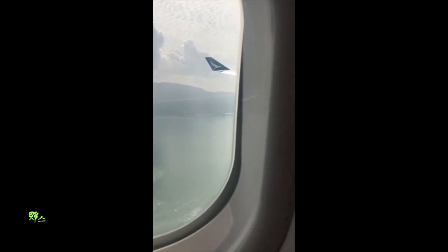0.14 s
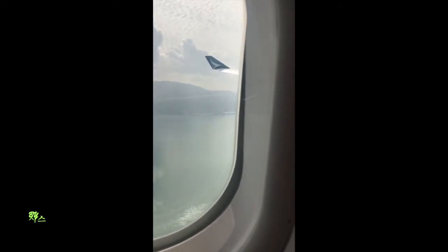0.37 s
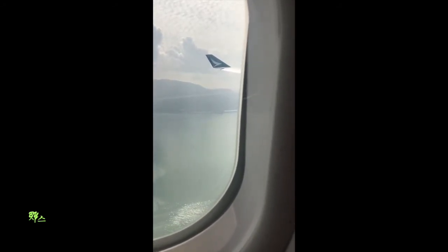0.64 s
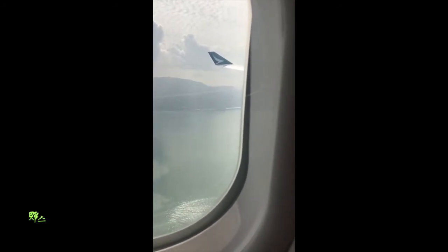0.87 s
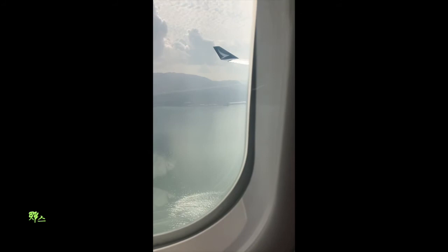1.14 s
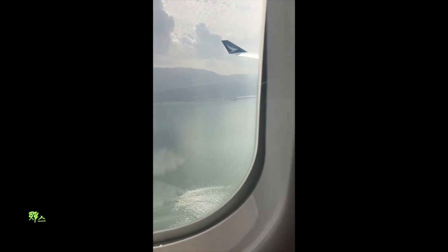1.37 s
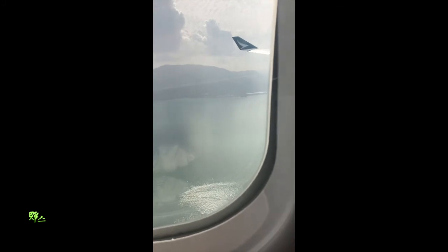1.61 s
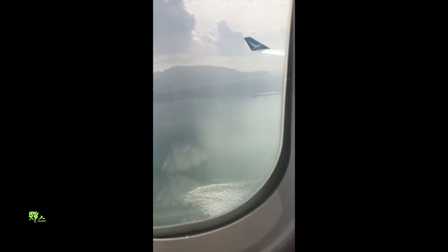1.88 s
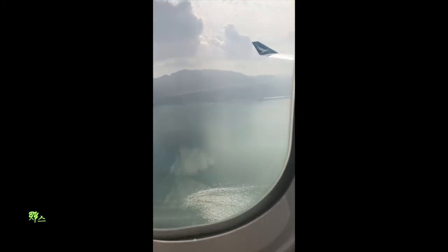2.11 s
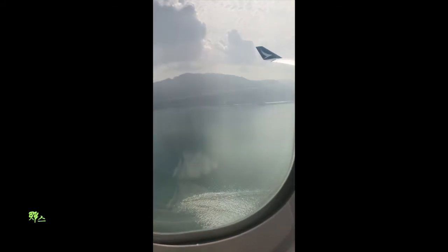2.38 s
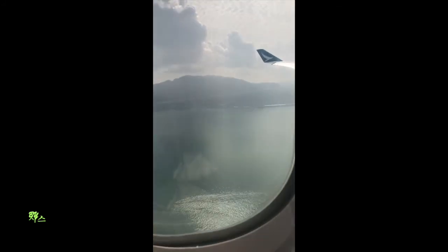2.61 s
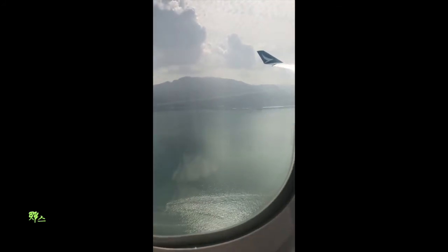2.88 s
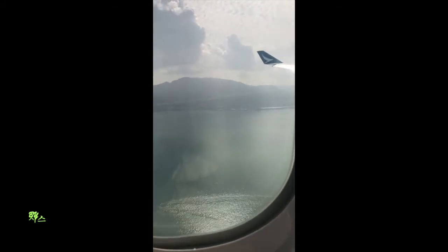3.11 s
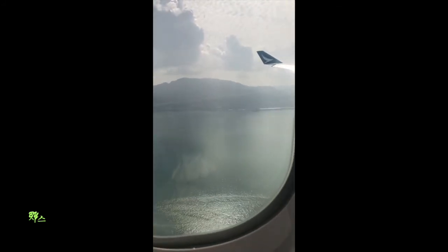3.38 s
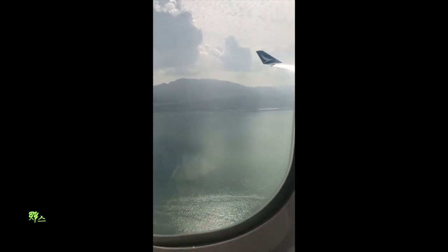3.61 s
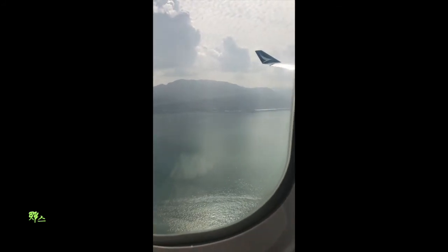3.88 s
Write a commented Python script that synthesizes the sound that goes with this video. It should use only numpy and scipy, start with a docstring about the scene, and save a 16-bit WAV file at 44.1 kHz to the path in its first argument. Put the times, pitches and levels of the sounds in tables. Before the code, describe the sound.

Jet engine rumble and vent hiss inside a flying airliner, soft cloth rustle fading early

```python
"""Inside an airliner in flight, a phone held at the window. From the start, shaped noise and low shaft tones
rumble through the hull in surges, noise hisses from the air vents, and wandering sines make the fan whine and
the 400 Hz supply sing. Cloth noise close by dies away by 1.7 s; tiny clicks crackle at random throughout.
Decaying noise ticks start at 0.07 s, one about every second from 0.53 s with others between; short hisses
of treble noise come from 0.23 s, and faint blips of sagging sines from 0.61 s."""
import sys
import numpy as np
from scipy import signal
from scipy.fft import rfft, irfft, next_fast_len
from scipy.io import wavfile
from scipy.ndimage import uniform_filter1d, map_coordinates

SR = 44100
rng = np.random.default_rng(int(sys.argv[2]) if len(sys.argv) > 2 else 0)


def log_audio(samples):
    """Write samples as a 16-bit WAV file to the path given in sys.argv[1]."""
    # one column per channel
    frames = np.atleast_2d(samples).T
    # limit to full scale, then quantise
    limited = np.clip(frames, -1, 1)
    pcm = np.round(limited * 32767).astype(np.int16)
    wavfile.write(sys.argv[1], SR, pcm)


def volts_from_decibels(level):
    """Turn decibel levels (scalar or array-like) into linear amplitude factors."""
    exponent = np.asarray(level, float) / 20
    return 10 ** exponent


N = 176400  # samples, 4 s


def unit(x):
    """Scales a signal to rms 1."""
    return x / np.sqrt(np.mean(x ** 2) + 1e-20)


def along(points, hz):
    """Reads (Hz, value) points on a log frequency axis."""
    point_hz, value = np.transpose(points)
    return np.interp(np.log(hz + 1), np.log(point_hz + 1), value)


def wobble(rate):
    """A smooth random curve with this many knots a second."""
    knots = rng.standard_normal(int(N * rate / SR) + 4)
    return map_coordinates(knots, [np.arange(N) * rate / SR])


def filtered(x, response):
    """Multiplies the spectrum of x by a response of frequency."""
    size = next_fast_len(x.shape[-1] + 8192)
    spectrum = rfft(x, size) * response(np.fft.rfftfreq(size, 1 / SR))
    return irfft(spectrum, size)[..., :x.shape[-1]]


def rush(spectrum, patchy_db):
    """Coloured noise of rms 1 whose level varies in patches of time and frequency."""
    pad = SR // 2
    cells = signal.stft(rng.standard_normal(N + 2 * pad), nperseg=512)[2]
    patches = uniform_filter1d(rng.standard_normal(cells.shape), size=8, axis=0)
    patches = uniform_filter1d(patches, size=10, axis=1)
    noise = signal.istft(cells * volts_from_decibels(patchy_db * unit(patches)), nperseg=512)[1]
    coloured = filtered(noise, lambda hz: volts_from_decibels(along(spectrum, hz)))
    return unit(coloured[pad:pad + N])


def tones(rows, rate, sway_db):
    """Sums sines that wander a little in pitch and level."""
    total = np.zeros(N)
    for pitch_hz, level_db, wander_hz in rows:
        level = np.sqrt(2) * volts_from_decibels(level_db + sway_db * wobble(rate))  # rms to peak
        cycles = np.cumsum(pitch_hz + wander_hz * wobble(rate)) / SR + rng.random()
        total += level * np.sin(2 * np.pi * cycles)
    return total


# colour of the noise the hull lets through: pitch_hz, relative level_db (per Hz)
HULL_COLOUR = [(13, -48.5), (24, -34), (30, -16), (36, -3.5), (50, -2.5), (75, -0.5), (100, -1), (125, -6),
               (150, -8.5), (185, -10), (200, -12), (245, -14), (280, -12.5), (295, -16), (340, -17.5),
               (370, -24), (385, -28), (430, -26.5), (450, -37), (490, -40), (700, -45), (910, -58.5),
               (1540, -120)]
# low tones of the engine shafts: pitch_hz, level_db (rms, before the surges and throb), wander_hz
SHAFT_TONES = [(39.1, -42, 2.76), (65.54, -43.5, 2.92), (87.65, -41, 3.01), (102.6, -42.5, 3.047)]
# surges of the deep rumble: time_s, gain_db
RUMBLE_SURGES = [(0, 0.5), (.15, -1), (.26, 3), (.38, -1), (.79, 1), (1.24, -2), (1.55, 2), (1.6, -3.5),
                 (1.73, 3), (1.78, -1), (2.38, -.5), (2.43, -2.5), (2.47, 2.5), (2.53, 0.5), (2.72, 2.5),
                 (2.8, -3), (2.84, .5), (3.36, .5), (3.5, -3.5), (3.63, 4), (3.68, 1.5), (4, -1)]


def hull():
    """Engine and airstream rumble with shaft tones in it: the deep part surges, the part above throbs."""
    surge_top_hz, throb_db = 135, 1.16
    time_s, gain_db = np.transpose(RUMBLE_SURGES)
    surge_db = np.interp(np.arange(N) / SR, time_s, gain_db)
    rumble = volts_from_decibels(-27.5) * rush(HULL_COLOUR, patchy_db=0.33) + tones(SHAFT_TONES, rate=6, sway_db=3.5)
    deep = filtered(rumble, lambda hz: 1 / (1 + (hz / surge_top_hz) ** 6))
    return volts_from_decibels(surge_db) * deep + volts_from_decibels(throb_db * wobble(7.015)) * (rumble - deep)


# colour of the cabin air noise: pitch_hz, relative level_db (per Hz)
VENT_COLOUR = [(260, -23.5), (450, -2), (570, -8), (614, -5.5), (702, -8.5), (767, -7), (917, -13),
               (1160, -14.5), (1250, -19), (1350, -16.5), (1730, -18.5), (1980, -23), (2170, -23.5),
               (2370, -26), (2550, -23.5), (2960, -25), (4280, -29.5), (4580, -30.5), (4780, -34.5),
               (4980, -35.5), (5350, -29), (5800, -33), (6600, -33.5), (7640, -37), (10300, -40),
               (11600, -40.5), (15600, -42)]


def vents():
    """The smooth hiss of cabin air: broadband noise that sways slightly in level."""
    level_db = -56 + 0.29 * wobble(9)
    return volts_from_decibels(level_db) * rush(VENT_COLOUR, patchy_db=0.8)


# fan and turbine tones: pitch_hz, level_db (rms), wander_hz
FAN_TONES = [(2243, -79, 5), (1975, -87, 8), (2912, -89, 12), (3332, -90, 2), (15492, -103, 2)]
# overtones of the power supply: multiple of its frequency, level_db (rms)
SUPPLY_OVERTONES = [(16, -100), (18, -91), (20, -97), (22, -98), (24, -100), (26, -101), (28, -101),
                    (30, -95), (31, -104), (32, -103), (34, -105), (36, -102)]


def whines():
    """Wandering fan and turbine tones, and steadier harmonics of the power supply."""
    supply_hz, supply_wander_hz = 399.63, 0.4
    supply = [(multiple * supply_hz, level_db, supply_wander_hz) for multiple, level_db in SUPPLY_OVERTONES]
    return tones(FAN_TONES, rate=9, sway_db=1.5) + tones(supply, rate=5, sway_db=1.5)


# loudness of the cloth: time_s, level_db (rms)
RUSTLE_LEVEL = [(0, -64), (.2, -62.5), (.3, -65), (.45, -62.5), (.68, -63.5), (.74, -68), (1.5, -70.5),
                (1.7, -90.5), (4, -87)]
# colour of the cloth noise: pitch_hz, relative level_db (per Hz)
CLOTH_COLOUR = [(400, -38), (850, 0.5), (1500, -2.5), (2200, -8.5), (3500, -15.5), (6000, -21), (9500, -27),
                (11500, -24.5), (13500, -31.5), (16000, -42.5)]


def rustle():
    """Cloth brushing near the phone: patchy friction noise, dying away."""
    time_s, level_db = np.transpose(RUSTLE_LEVEL)
    level = volts_from_decibels(np.interp(np.arange(N) / SR, time_s, level_db))
    return level * rush(CLOTH_COLOUR, patchy_db=1.5)


TICK_T60_S = 0.011  # time in which a click falls by 60 dB, in crackle and ticks


def crackle():
    """Tiny bright clicks, scattered at random: each is a fast-decaying burst of high-passed noise."""
    clicks_per_s, faintest_db, spread_db, lowest_hz = 25, -71, 1.5, 11500  # levels before the high-pass
    draw = rng.random((400, 2))
    time_s = np.cumsum(-np.log(draw[:, 0]) / clicks_per_s)
    size = volts_from_decibels(faintest_db - spread_db * np.log(draw[:, 1]))
    inside = time_s < N / SR
    blows = np.bincount((time_s[inside] * SR).astype(int), size[inside], N)
    decay = volts_from_decibels(-60 * np.arange(SR // 100) / SR / TICK_T60_S)
    burst = np.convolve(blows, decay)[:N] * rng.standard_normal(N)
    return signal.sosfilt(signal.butter(4, lowest_hz, "high", fs=SR, output="sos"), burst)


# sharp clicks: start_s, level_db (before the common 5.5 dB trim), lowest_hz
TICK_EVENTS = [(.0720, -51.5, 2520), (.5337, -57, 10900), (.7365, -66, 12000), (1.5387, -57.5, 8000),
               (1.5460, -61, 5020), (1.5911, -67, 12000), (1.6909, -64.5, 11500), (2.5441, -60, 10500),
               (3.3665, -64, 12100), (3.3985, -63, 11600), (3.4324, -65.5, 11600), (3.5485, -63, 11500)]


def ticks():
    """Sharp bright clicks with a brief rattle: high-passed noise under a fast decay and a short plateau."""
    tilt_db_per_octave, rattle_s, rattle_db = -3, 0.009, -9
    out, t = np.zeros(N + SR), np.arange(SR // 8) / SR
    shape = volts_from_decibels(-60 * t / TICK_T60_S) + volts_from_decibels(rattle_db) * np.exp(-(t / rattle_s) ** 4)
    for start_s, level_db, lowest_hz in TICK_EVENTS:
        high = signal.butter(3, min(lowest_hz, 15000), "high", fs=SR, output="sos")
        noise = rng.standard_normal(len(t))
        tilted = filtered(noise, lambda f: volts_from_decibels(tilt_db_per_octave * np.log2(1 + f / lowest_hz)))
        click = shape * unit(signal.sosfilt(high, tilted))
        out[round(start_s * SR):][:len(t)] += volts_from_decibels(level_db - 5.5) * click
    return out[:N]


# short hisses from close by: start_s, length_s, level_db (rms), centre_hz
HISS_EVENTS = [(.23, 0.087, -77, 6500), (0.765, .11, -73, 6200), (1, .21, -75, 6100),
               (1.335, 0.045, -74, 7000), (2.0, 0.087, -82, 7000), (2.08, .04, -73.5, 6500),
               (2.764, .04, -76, 6000), (3.43, .04, -80, 6000), (3.34, .3, -85.5, 14500)]


def hisses():
    """Short bursts of treble noise with soft edges, a grainy level and each its own uneven colour."""
    octaves, edge_s, grain_db = 0.6, 0.01, 1.5
    bump_db, bump_spacing_hz = 2.5, 250
    out, t, grain = np.zeros(N), np.arange(N) / SR, volts_from_decibels(grain_db * wobble(120))
    for start_s, length_s, level_db, centre_hz in HISS_EVENTS:
        a, b = int((start_s - .1) * SR), int((start_s + length_s + .1) * SR)
        bumps_db = bump_db * rng.standard_normal(100)

        def colour(f):
            """A flat-topped band with random bumps."""
            band = np.exp(-(np.log2((f + 1) / centre_hz) / octaves) ** 4 / 2)
            return volts_from_decibels(np.interp(f / bump_spacing_hz, range(100), bumps_db)) * band

        hiss = unit(filtered(rng.standard_normal(b - a), colour))
        since_s = t[a:b] - start_s
        gate = (np.tanh(since_s / edge_s) - np.tanh((since_s - length_s) / edge_s)) / 2
        out[a:b] += volts_from_decibels(level_db) * gate * hiss * grain[a:b]
    return out


# faint blips: middle_s, level_db (peak, before roughness), pitch_hz (at the middle), half_length_s
PING_EVENTS = [(.63, -65, 1981, .02), (.785, -70, 4330, .012), (.83, -73, 4250, .01),
               (1.04, -74, 4300, .01), (1.13, -71, 4500, .008), (1.197, -76, 4560, .01),
               (1.794, -68, 2604, .008), (2.014, -72, 4080, .007), (2.43, -66, 2913, .011),
               (3.333, -70, 2680, .008), (3.28, -72, 2880, .012), (3.368, -64, 2600, .01),
               (3.49, -72, 2960, .01), (3.53, -71, 3100, .008), (3.605, -72, 2560, .01),
               (3.617, -71, 2730, .01), (3.745, -69, 2590, .009), (3.424, -51, 613, .008),
               (3.874, -63, 2608, .007)]


def pings():
    """Faint rough blips like small squeaks of trim: sines with soft ends that sag in pitch."""
    sag_hz_per_s = 5000
    out, t = np.zeros(N), np.arange(N) / SR
    rough = 1 + 0.2 * wobble(250)
    for middle_s, level_db, pitch_hz, half_length_s in PING_EVENTS:
        since_s = t - middle_s
        swell = np.exp(-(since_s / half_length_s) ** 2)
        cycles = (pitch_hz - sag_hz_per_s * since_s / 2) * since_s
        out += volts_from_decibels(level_db) * swell * np.sin(2 * np.pi * cycles)
    return rough * out


def scene():
    """Everything in the cabin adds up at one microphone."""
    steady = hull() + vents() + whines()
    close_by = rustle() + crackle() + ticks() + hisses() + pings()
    return (steady + close_by)[None]


# dips and lift of phone and window recess: pitch_hz, width_hz, gain_db
MICROPHONE_COLOUR = [(4860, 130, -1), (7840, 290, -2.5), (10450, 320, -3.5), (15800, 600, 3.5)]


def microphone(dry):
    """The phone at the window: resonant dips and a lift in the treble, then its bass cut at 23.7 Hz."""
    def colour(f):
        """Sums the bell-shaped dips and lift."""
        return volts_from_decibels(sum(gain_db * np.exp(-((f - pitch_hz) / width_hz) ** 2 / 2)
                       for pitch_hz, width_hz, gain_db in MICROPHONE_COLOUR))

    low_cut = signal.butter(2, 23.7, "high", fs=SR, output="sos")
    return signal.sosfilt(low_cut, filtered(dry, colour))


def roll_off(x):
    """The treble ends steeply here."""
    return signal.sosfilt(signal.butter(12, 15710, fs=SR, output="sos"), x)


def record(dry):
    """Takes the cabin sound through the phone."""
    heard = microphone(dry)
    return roll_off(heard)


dry = scene()
out = record(dry)
log_audio(out)
```